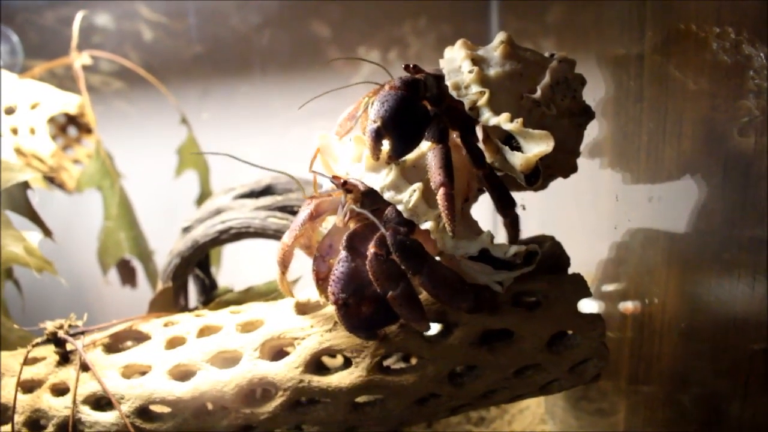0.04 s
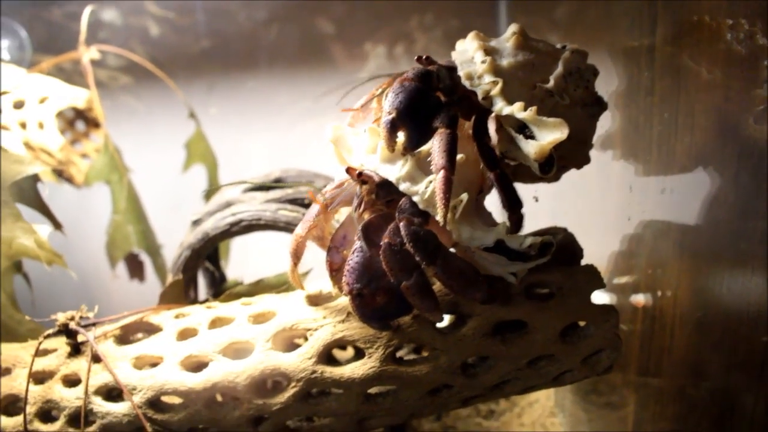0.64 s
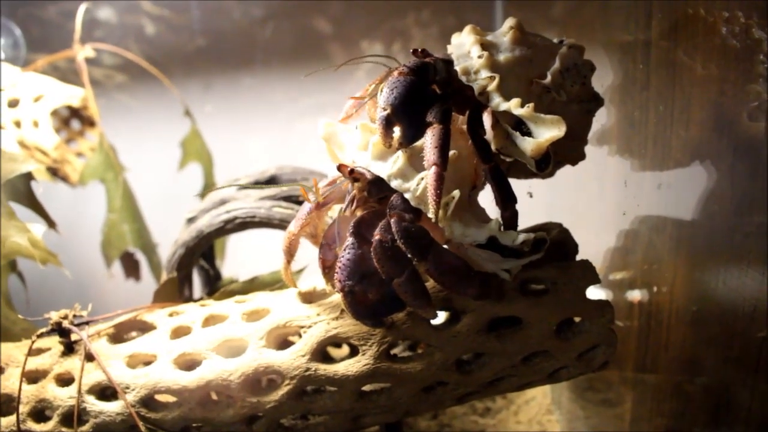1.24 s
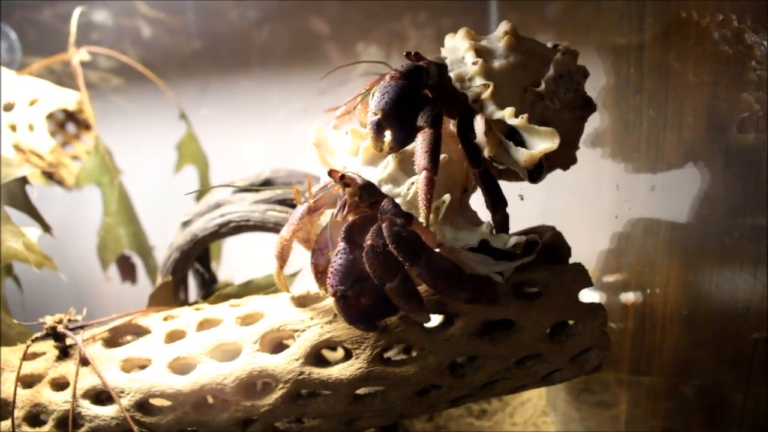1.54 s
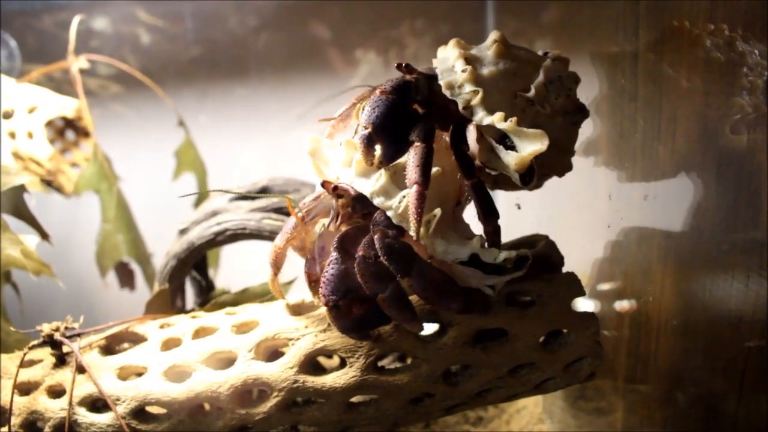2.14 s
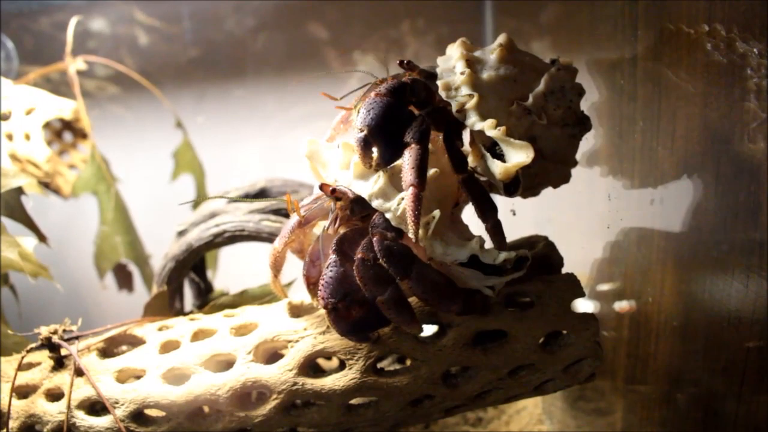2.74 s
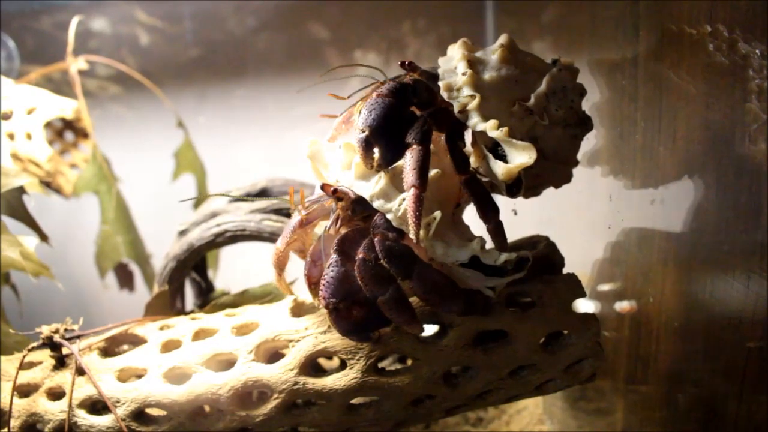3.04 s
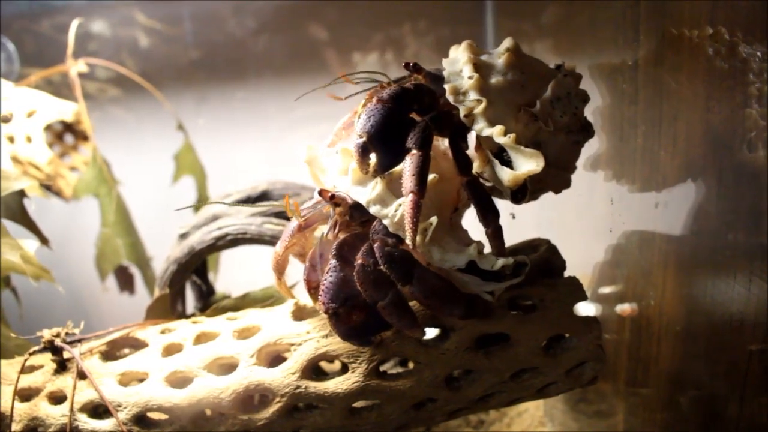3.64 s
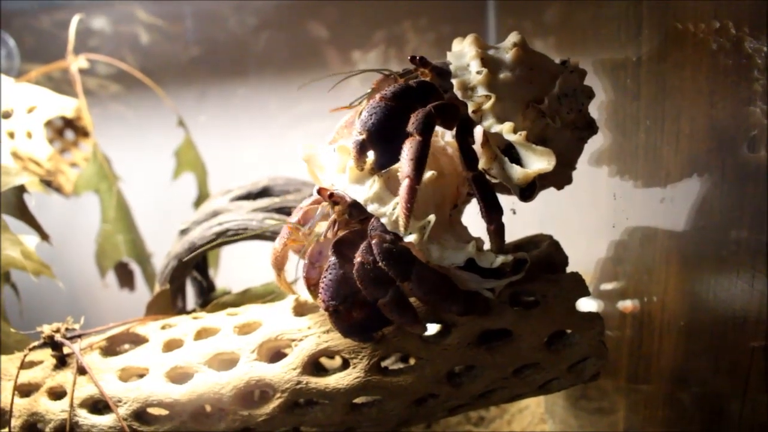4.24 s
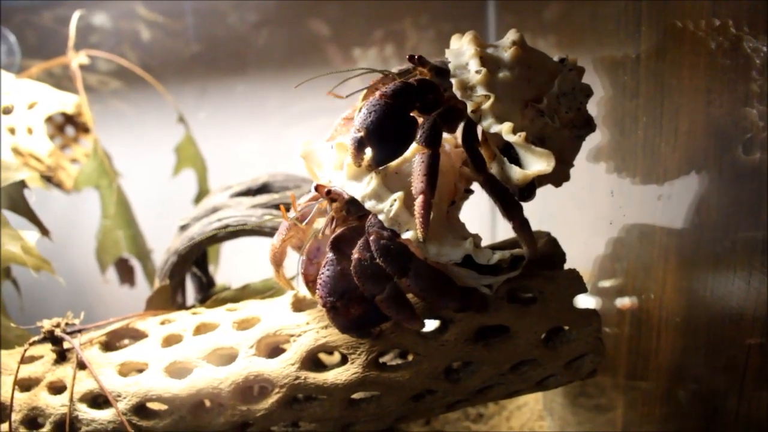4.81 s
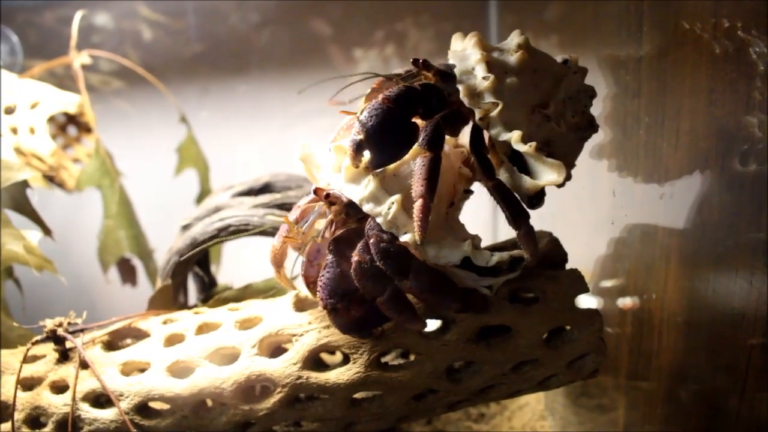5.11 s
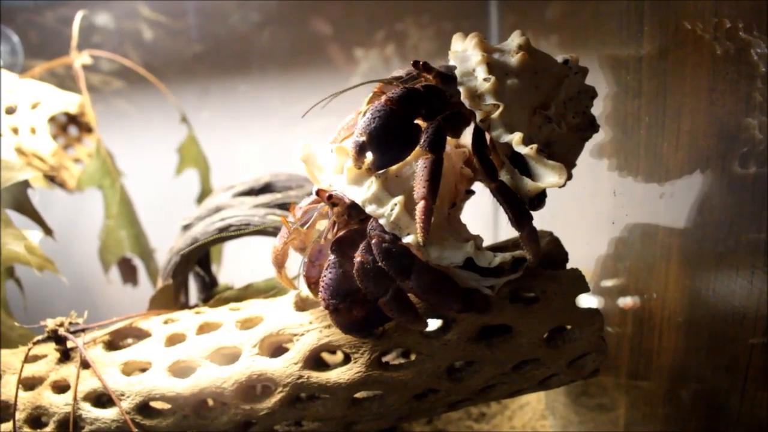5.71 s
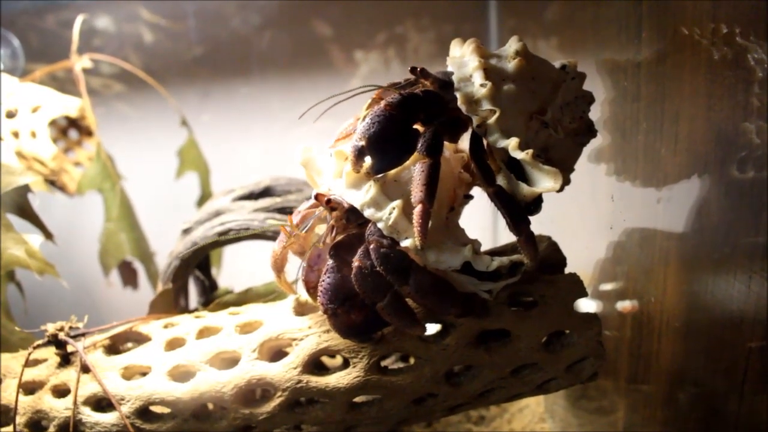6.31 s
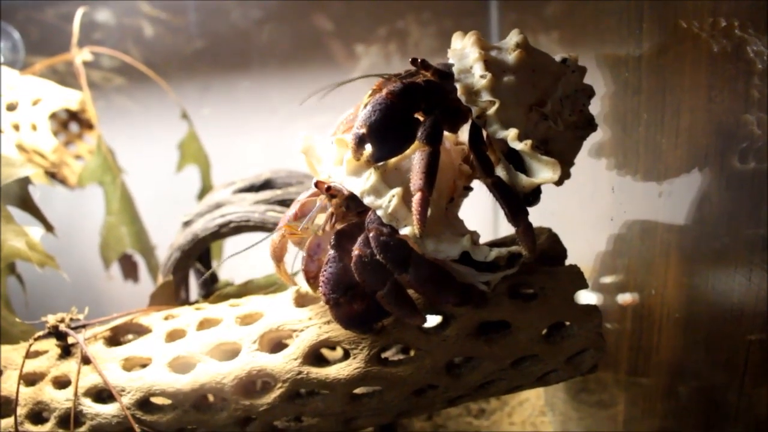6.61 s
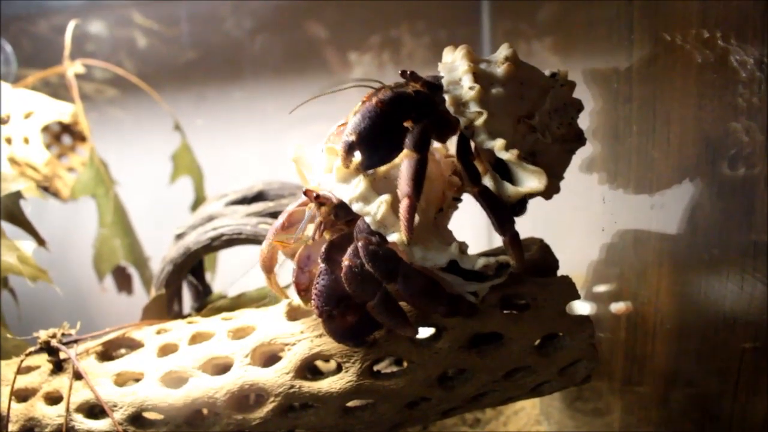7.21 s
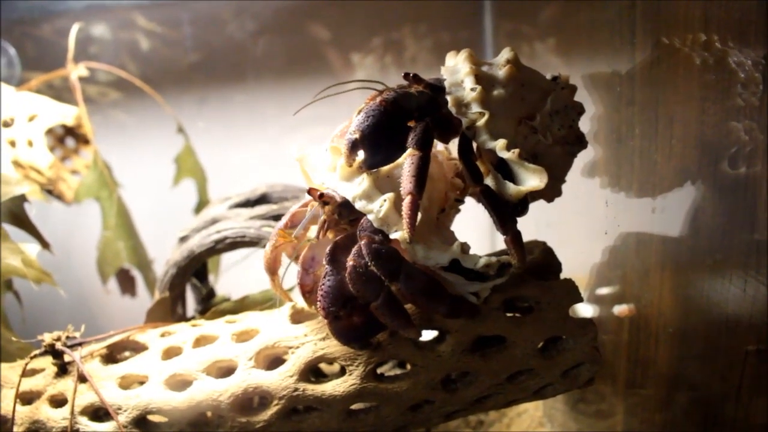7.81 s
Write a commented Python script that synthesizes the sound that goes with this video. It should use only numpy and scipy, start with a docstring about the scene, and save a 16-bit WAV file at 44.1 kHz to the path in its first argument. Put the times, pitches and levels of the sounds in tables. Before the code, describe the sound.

Two hermit crabs jostle on a hollow log in a glass tank, close to a stereo microphone. One sharp shell knock comes early, followed by a run of short, soft rasps mixed with more knocks. Then the rasping stops, leaving lighter, scattered taps and faint claw ticks. An air conditioner drones steadily in the room behind, with a light hiss.

```python
"""Two hermit crabs jostle on a hollow log in a glass tank, close to a stereo pair of microphones.
Shells knock on the wood and rock back with a dull thud, claw tips tick and squeak as they slip,
and one crab rasps in a run of short strokes, a ridge dragged over a hard edge. The glass echoes it all.
In the room behind, an air conditioner drones and throbs, and a second low hum sinks and fades."""
import sys
import numpy as np
from scipy import signal
from scipy.fft import rfft, irfft, next_fast_len
from scipy.io import wavfile

SR = 44100
rng = np.random.default_rng(int(sys.argv[2]) if len(sys.argv) > 2 else 0)


def transcribe(u):
    """Save the signal u as a 16-bit wav file named by the first command-line argument.

    u: samples, shape (n,) or (channels, n), limited to [-1, 1]; the rate is SR.
    q: integer samples, one column per channel.
    """
    v = np.clip(np.atleast_2d(u).T, -1, 1)
    q = np.round(v * 32767).astype(np.int16)
    wavfile.write(sys.argv[1], SR, q)


N = 351036


def amp(db):
    """Decibels to gain."""
    return 10 ** (np.asarray(db) / 20)


def read_curve(points, hz):
    """Reads a table on a logarithmic frequency axis."""
    f, value = np.transpose(points)
    return np.interp(np.log(hz + 1), np.log(f + 1), value)


def add(mix, s, sound):
    """Mixes a sound in at time s."""
    part = mix[round(s * SR):][:len(sound)]
    part += sound[:len(part)]


def noise(gain, size=N):
    """Noise of rms one whose spectrum follows the function gain(Hz)."""
    full = next_fast_len(size)
    spectrum = rfft(rng.standard_normal(full)) * gain(np.fft.rfftfreq(full, 1 / SR))
    x = irfft(spectrum, full)[:size]
    return x / np.sqrt(np.mean(x ** 2) + 1e-20)


def resonance(hz, centre_hz, width_hz):
    """A bell-shaped peak of height one."""
    return 1 / (1 + (2 * (hz - centre_hz) / width_hz) ** 2)


def ring(modes, spread_db, size=8192):
    """Decaying modes; the point of contact sets how strongly each one answers."""
    t = np.arange(size) / SR
    hz, db, t60 = np.transpose(modes)[:, :, None]
    db = db + spread_db * rng.standard_normal(db.shape)
    return (amp(db - 60 * t / t60) * np.cos(2 * np.pi * hz * t)).sum(0)


def soften(x, corner_hz):
    """A softer contact lasts longer and so loses its treble."""
    return signal.sosfilt(signal.butter(2, corner_hz, fs=SR, output="sos"), x)


def confine(x, low_hz, high_hz):
    """A small body radiates little bass, and wood swallows the top."""
    x = signal.sosfilt(signal.butter(3, low_hz, "high", fs=SR, output="sos"), x)
    return signal.sosfilt(signal.butter(8, high_hz, fs=SR, output="sos"), x)


# spectrum of the moving air in the room: f/Hz, level/dB
AIR_SPECTRUM = [(20, -23), (40, -11), (62, -3), (100, 4.5), (125, -3.5), (155, 5), (250, 0.5), (320, -4),
                (420, -11.5), (600, -16), (900, -24), (1500, -28), (4000, -31.5), (15000, -60)]
# resonances of the duct: f/Hz, width/Hz, lift/dB
DUCT_RESONANCES = [(295.8, 23, 6.8), (379.4, 20, 9.7), (451, 10, 9.2)]
def air_rush():
    """The rush of air, lifted at the resonances of the duct."""
    def gain(hz):
        lift_db = sum(db * resonance(hz, f, width) for f, width, db in DUCT_RESONANCES)
        return amp(read_curve(AIR_SPECTRUM, hz) + lift_db)
    return noise(gain)


# steady tones of the air conditioner: f/Hz, level/dB
UNIT_TONES = [(59.2, -50.5), (209.9, -57)]
# drone, hum and rasps are louder at the right microphone; rows left, right: level/dB
SCENE_PAN = [
    [-5.5],
    [1.21],
]
def air_conditioner(throb_db=2, throb_s=1.365, throb_top_s=1.84):
    """Behind the tank: rushing air, a booming resonance that throbs slowly, and steady tones."""
    t = np.arange(N) / SR
    rush = air_rush() + amp(-13) * np.array([air_rush(), air_rush()])  # mostly common to both sides
    eddies = np.array([noise(lambda hz: hz / (1 + (hz / 55) ** 4)) for _ in range(2)])  # one per side
    boom = noise(lambda hz: resonance(hz, centre_hz=204.1, width_hz=17.3))
    boom *= amp(-50 + throb_db * np.cos(2 * np.pi * (t - throb_top_s) / throb_s))
    tones = sum(amp(db) * np.sqrt(2) * np.sin(2 * np.pi * (hz * t + rng.random()))
                for hz, db in UNIT_TONES)
    return amp(SCENE_PAN) * (amp(-46) * rush + boom + tones) + amp(-63) * eddies


def fading_hum(from_hz=76.5, to_hz=70.5, slowing_at_s=3, slowing_s=0.81, fade_db_per_s=1.26):
    """A low hum and its octave slow from one speed to another as they fade."""
    t = np.arange(N) / SR
    hz = to_hz + (from_hz - to_hz) / (1 + np.exp((t - slowing_at_s) / slowing_s))
    phase = 2 * np.pi * np.cumsum(hz) / SR
    hum = np.sin(phase) + amp(-7) * np.sin(2 * phase)
    return amp(-48 - fade_db_per_s * t) * np.sqrt(2) * hum


# modes of the log and tank together: f/Hz, level/dB, t60/s
LOG_MODES = [(260.5, -11, 0.14), (323, 2, 0.036), (432, -6.5, 0.022), (570, -8.5, 0.045), (738, -14.5, 0.1),
             (966, -9.5, 0.033), (992, -10.5, 0.055), (1155, -12.5, 0.052), (1410, -10, 0.025),
             (1472, -12.5, 0.019), (1956, 2.5, 0.013), (2055, -10.5, .042), (2100, -6.5, 0.021),
             (2730, -15, 0.025), (2894, -4, 0.029), (3750, 5, 0.021)]
def blow(corner_hz, note_hz, note_t60_s=0.017, bounce_s=0.002018, bounce=0.27):
    """One blow rings the log and the struck spot; the nearest glass wall throws it straight back."""
    body = soften(ring(LOG_MODES, spread_db=1.5), corner_hz)
    t = np.arange(len(body)) / SR
    note_db = -6.5 + 3 * np.log2(corner_hz / 1000)  # harder contacts ring the spot more
    note = amp(note_db - 60 * t / note_t60_s) * np.sin(2 * np.pi * note_hz * t)
    sound = confine(body + note, low_hz=209, high_hz=3270)
    sound += bounce * np.interp(t - bounce_s, t, sound, left=0)
    return sound / abs(sound).max()


def skid(centre_hz, width_hz, length_s):
    """A hard tip skids for a few milliseconds: a bright burst that rises fast and dies away."""
    burst = noise(lambda hz: 1 / (1 + (2 * (hz - centre_hz) / width_hz) ** 4) ** .5, size=4096)
    age = 4 * np.arange(len(burst)) / SR / length_s
    burst *= age * np.exp(-age)
    return burst / abs(burst).max()


# shell and leg on the log, close up:
# t/s, level/dB, contact hardness as a corner f/Hz, struck spot f/Hz, thud level/dB relative to the blow
SHELL_KNOCKS = [(0.2646, -30.5, 655, 2110, -5), (0.7798, -32, 820, 1380, -19), (0.79, -7, 1400, 2800, -22),
                (1.3994, -34.5, 380, 474, -21), (1.624, -36, 640, 654, -15), (2.0447, -15, 810, 2386, -16),
                (2.5391, -21, 660, 960, -17), (2.5674, -26.5, 1660, 2170, 0.5),
                (2.6388, -27.5, 370, 400, -17), (2.6471, -30, 654, 2170, -5), (2.748, -36.5, 490, 970, -15),
                (3.2332, -23, 500, 970, -16), (3.2529, -38, 440, 690, 5.5), (3.9116, -30, 480, 520, -19),
                (3.9192, -27.5, 1000, 1040, -4.5), (4.4311, -32.5, 700, 730, -1),
                (4.8044, -38.5, 1100, 1080, -21), (4.854, -40.5, 1070, 1190, -15),
                (5.5751, -30.5, 600, 940, -3.5), (6.647, -37.5, 780, 980, -3),
                (6.893, -32.5, 2300, 1500, -15)]
def knocks(rock_delay_s=0.007):
    """Each knock is a blow with a faint crack, then a dull thud as the shell rocks back."""
    out = np.zeros(N)
    for s, db, corner_hz, note_hz, thud_db in SHELL_KNOCKS:
        add(out, s, amp(db) * blow(corner_hz, note_hz))
        crack_gain = amp(db - 31.5) * corner_hz / 1000  # harder contacts crack more
        add(out, s, crack_gain * skid(centre_hz=3780, width_hz=4500, length_s=0.0094))
        add(out, s + rock_delay_s, amp(db + thud_db) * blow(corner_hz=275, note_hz=372))
    return out


# claw squeaks, midway between the microphones: t/s, level/dB
CLAW_SQUEAKS = [(0.741, -50.5), (3.9335, -45.5), (4.967, -52)]
def squeaks():
    """A claw tip slips and squeaks on one thin note."""
    out = np.zeros(N)
    for s, db in CLAW_SQUEAKS:
        add(out, s, amp(db) * skid(centre_hz=4910, width_hz=330, length_s=0.015))
    return out


# one crab's strokes, close up: t/s, length/s, level/dB
RASP_STROKES = [(0.854, 0.019, -54), (0.928, 0.021, -52), (1.0515, .017, -50.5), (1.21, 0.043, -49),
                (1.344, 0.028, -54), (1.494, 0.037, -47.5), (1.627, 0.026, -52), (1.764, 0.022, -44),
                (1.923, 0.025, -51.5), (2.143, 0.013, -43.5), (2.232, .034, -44.5), (2.35, .036, -50.5),
                (2.465, 0.027, -45.5), (2.672, 0.027, -49.5), (2.865, 0.026, -47), (3.115, 0.037, -51),
                (3.484, .031, -48.5), (4.827, 0.027, -57.5), (4.898, 0.032, -64), (4.967, 0.016, -55.5)]
# modes of its shell and the log: f/Hz, level/dB, t60/s
SHELL_MODES = [(559, 7, 0.059), (630, 11, 0.049), (723, 6.5, 0.085), (953, 4.5, 0.063), (1020, -22, 0.057),
               (1130, -4, 0.039), (1400, -3.5, 0.035), (2080, 3, .02), (2350, -5, .02), (2880, -7, .025)]
def rasps(slips_per_s=420, jitter=0.55, dull_hz=1130, keen_hz=1880):
    """Each stroke drags a ridge over a hard edge: a quick, uneven run of slips rings the shell."""
    out = np.zeros(N)
    for s, length, db in RASP_STROKES:
        keenness = np.exp(-((s - 2.45) / 0.25) ** 2)  # the strokes sharpen at the height of the run
        corner_hz = dull_hz + (keen_hz - dull_hz) * keenness
        gaps, sizes = rng.standard_normal((2, 40))
        slip_s = np.cumsum(np.exp(jitter * gaps)) / slips_per_s
        slip_s -= slip_s[0]
        force = amp(2 * sizes - 3.2 * slip_s / length)  # the stroke bites, then eases off
        within = slip_s < length
        slips = np.bincount((slip_s[within] * SR).astype(int), force[within])
        shell = soften(ring(SHELL_MODES, spread_db=1.7), corner_hz)
        stroke = confine(signal.fftconvolve(slips, shell), low_hz=422, high_hz=3340)
        add(out, s, amp(db) * stroke * np.sqrt(length * SR / np.sum(stroke ** 2)))
    return out


# claw ticks, midway between the microphones: t/s, level/dB, centre f/Hz, length/s
CLAW_TICKS = [(1.615, -54, 6500, .01), (2.639, -49.5, 7500, 0.015), (3.778, -52, 8000, 0.0091),
              (3.925, -53, 6000, .012), (5.818, -49.5, 5360, 0.019), (6.893, -54, 7000, .016),
              (7.782, -52, 2500, .045)]
def ticks():
    """Claw tips tick and scratch over a wide band."""
    out = np.zeros(N)
    for s, db, centre_hz, length in CLAW_TICKS:
        add(out, s, amp(db) * skid(centre_hz, width_hz=0.6 * centre_hz, length_s=length))
    return out


# decay inside the glass tank: f/Hz, t60/s
TANK_DECAY = [(200, 0.17), (700, 0.092), (2000, 0.067), (6000, 0.015)]
def tank_echoes(x, size=11025, echoes_per_s=3000, build_s=0.0012):
    """Dense echoes build between the glass walls, different at each microphone."""
    taps = rng.choice([-1., 1.], (2, size)) * (rng.random((2, size)) < echoes_per_s / SR)
    hz, t, spectra = signal.stft(taps, SR, nperseg=256)
    decay = amp(-60 * t / read_curve(TANK_DECAY, hz)[:, None])
    tail = signal.istft(spectra * decay, SR, nperseg=256)[1]
    tail *= 1 - np.exp(-(np.arange(tail.shape[1]) / SR / build_s) ** 2)
    tail = tail + 0.78 * tail[::-1]  # the microphones sit close together
    tail /= np.linalg.norm(tail, axis=1)[:, None]
    return signal.fftconvolve(x[None], tail, axes=1)[:, :N]


def shade_left(x, corner_hz=4200):
    """The knocks reach the left microphone with less treble than the right."""
    return np.array([signal.lfilter(*signal.butter(1, corner_hz, fs=SR), x), x])


# knocks and echoes land to the right of the pair; rows left, right: level/dB
KNOCK_BALANCE = [
    [-4.5],
    [1.56],
]
def scene():
    """The crabs close by in their tank, over the drone of the room."""
    knock, rasp, claws = knocks(), rasps(), ticks() + squeaks()
    echoes = tank_echoes(amp(-13.5) * knock + amp(-19) * rasp + amp(-15) * claws)
    crabs = amp(KNOCK_BALANCE) * (shade_left(knock) + echoes) + amp(SCENE_PAN) * rasp + claws
    return crabs + amp(SCENE_PAN) * fading_hum() + air_conditioner()


# self-noise of the microphones: f/Hz, level/dB
MIC_HISS = [(100, 4), (700, 5), (1500, 1), (2800, -2), (4300, -3), (6500, -6.5), (10000, -10.5),
            (13000, -14.5), (15500, -17.5)]
def record(dry, hiss_db=-55.5, crossfeed=0.33, crossfeed_hz=4500, top_hz=15700):
    """The microphones add a hiss, slightly out of phase between the sides; the top treble is cut."""
    hiss = np.array([noise(lambda hz: amp(read_curve(MIC_HISS, hz))) for _ in range(2)])
    leak = signal.filtfilt(*signal.butter(1, crossfeed_hz, fs=SR), hiss[::-1])
    with_hiss = dry + amp(hiss_db) * (hiss - crossfeed * leak)
    band_limit = signal.firwin(511, top_hz, window=("kaiser", 9), fs=SR)
    return signal.oaconvolve(with_hiss, band_limit[None], "same")


dry = scene()
out = record(dry)
transcribe(out)
```